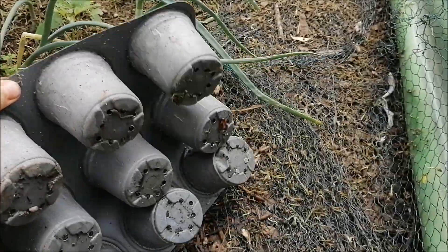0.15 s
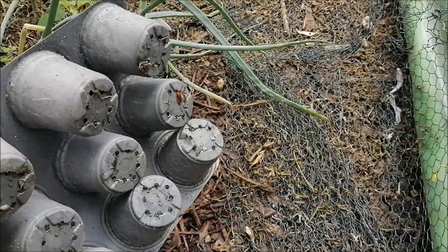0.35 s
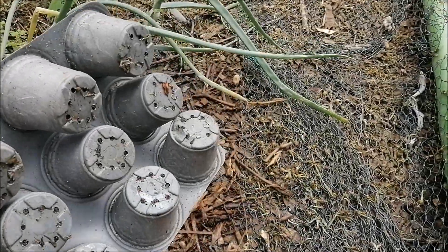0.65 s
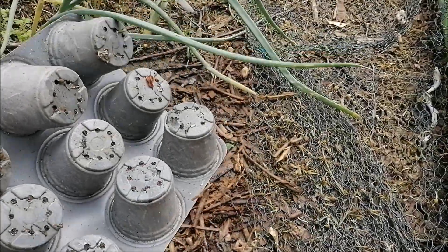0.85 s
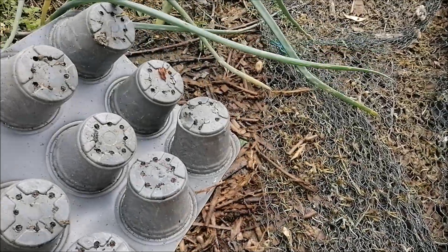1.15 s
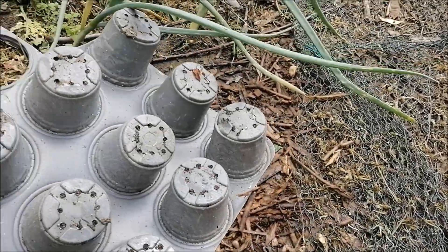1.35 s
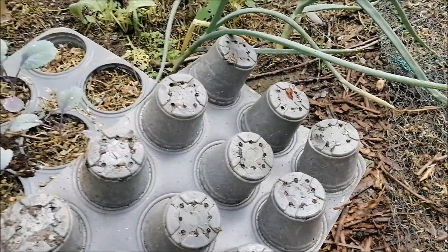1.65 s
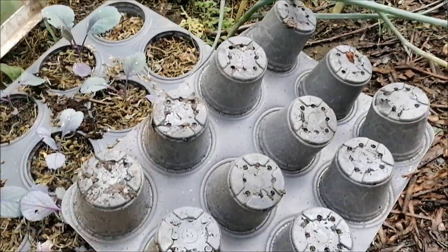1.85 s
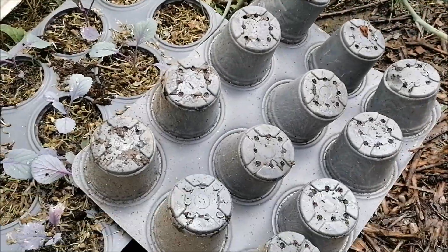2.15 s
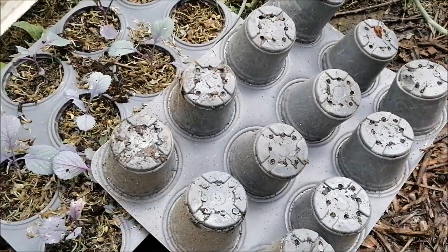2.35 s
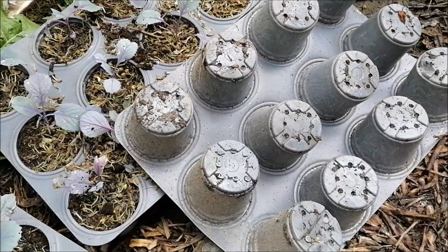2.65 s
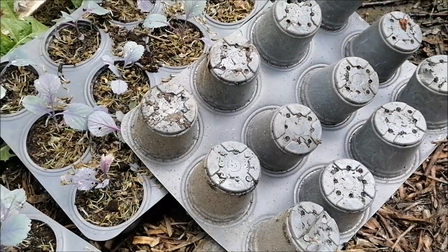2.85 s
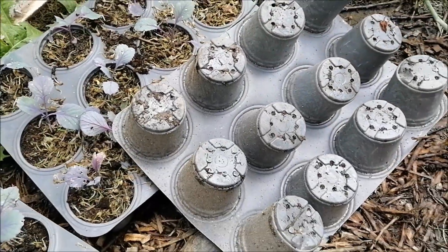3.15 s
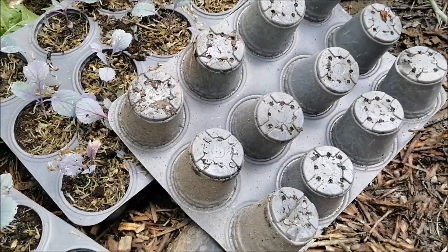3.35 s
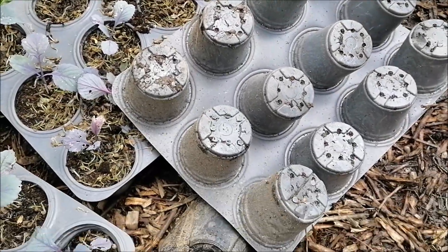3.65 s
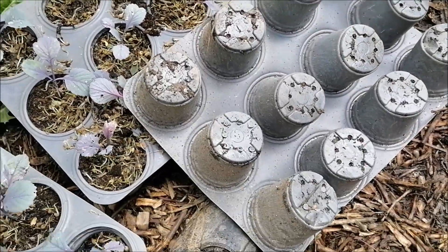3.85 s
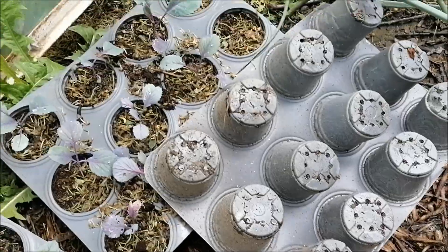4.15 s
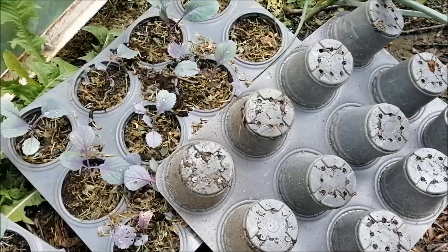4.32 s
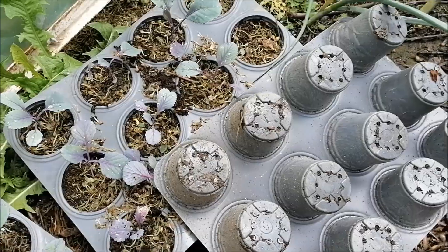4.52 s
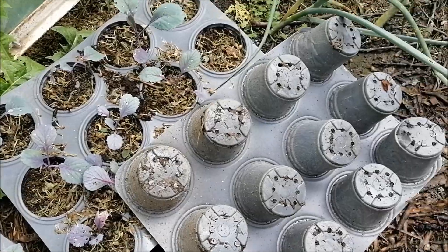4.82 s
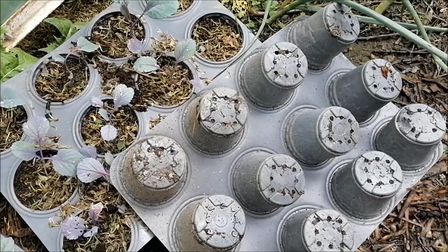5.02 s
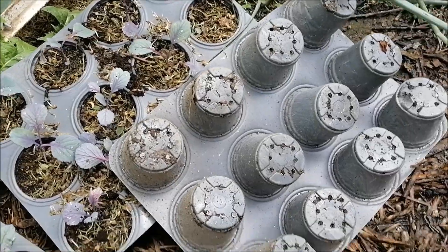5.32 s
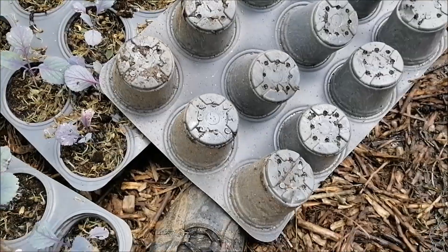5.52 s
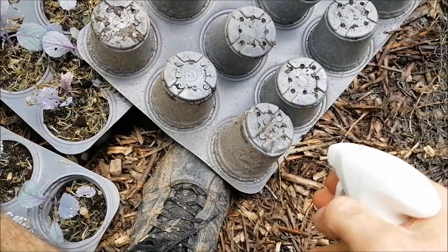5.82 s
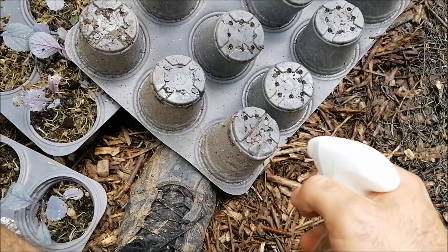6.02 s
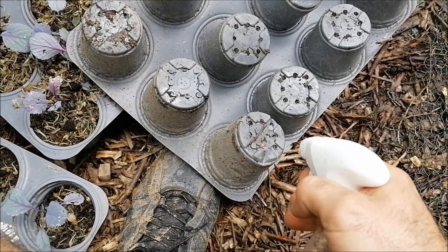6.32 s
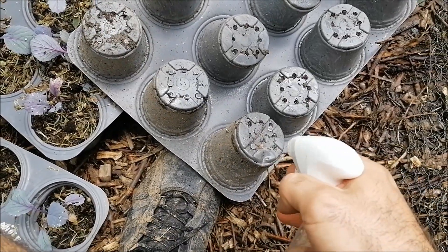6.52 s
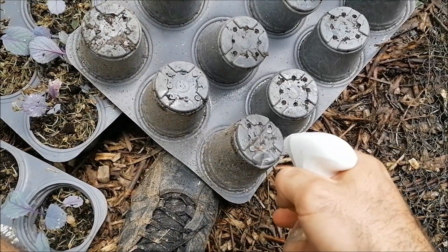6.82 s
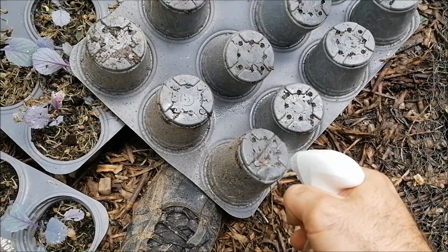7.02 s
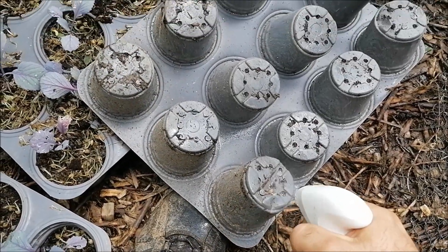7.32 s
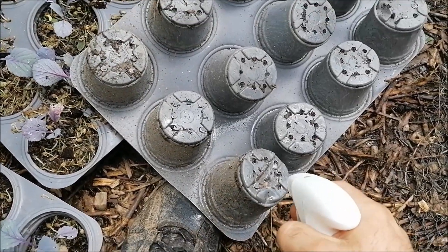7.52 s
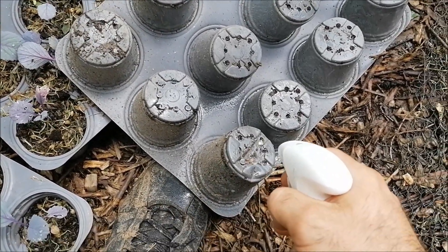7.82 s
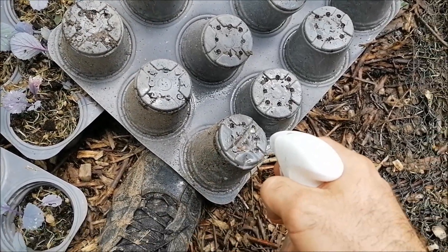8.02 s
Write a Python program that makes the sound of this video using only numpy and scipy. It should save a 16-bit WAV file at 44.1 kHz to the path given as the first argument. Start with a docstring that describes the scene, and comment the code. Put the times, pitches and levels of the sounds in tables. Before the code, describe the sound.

Near stereo microphones outdoors: a bright plastic knock comes first, followed by duller bumps and short scrapes. Sparrows chirp nearby and faintly farther off, echoing lightly from walls. Midway, liquid thumps and gurgles inside a handled plastic bottle, with cloth swishes and twig snaps. Finally come several trigger clicks and squeaky creaks, sputtering air and soft fading sprays, above a soft bed of far traffic.

```python
"""A garden close up: a thin plastic tray is turned over and set down, dragged over soil between knocks.
A half-full spray bottle is picked up and sloshes: thumps, rising bubbles and splashes.
Its trigger is pumped: creaks and spitting air are bursts of clicks, mist is a hiss of tiny grains.
Sleeves and leaves rustle as filtered grains, sparrows chirp as gliding sines between walls,
and far traffic hums as shaped noise."""
import sys
import numpy as np
from scipy import signal
from scipy.io import wavfile

SR = 44100
rng = np.random.default_rng(int(sys.argv[2]) if len(sys.argv) > 2 else 0)


def wav_out(sig):
    """Save sig, one row per channel (or a flat mono array), as 16-bit PCM at SR to the path in sys.argv[1]."""
    wavfile.write(sys.argv[1], SR, np.round(np.clip(np.atleast_2d(sig).T, -1, 1) * 32767).astype(np.int16))


def gain_from_decibels(decibels):
    """Convert decibel values to linear amplitude factors."""
    exponent = np.asarray(decibels, float) / 20
    return 10 ** exponent


N = 360297      # samples, a little over 8 s

# Open air with its hum. Each row: frequency in Hz, level in dB per Hz.
AIR_SPECTRUM = [(12, -35), (20, -8.5), (64, 0.5), (171, -6.5), (238, 2.5), (324, -4), (505, -21),
                (725, -18.5), (1380, -24.5), (3750, -18.5), (4430, -19.5), (8400, -39.5), (9660, -24),
                (11500, -39), (14300, -56), (15500, -64)]
AIR_DB = -53      # overall rms of air and hum, traffic swells included
# Traffic swelling. Each row: time in seconds, gain below 140 Hz in dB, gain from 140 to 400 Hz in dB.
TRAFFIC = [(0, 3.5, -2), (.7, 2, -5.5), (2, -1, -4), (3.3, 1, -5), (5, 4, 0), (6.3, 0, -4.5), (7, -3, -5.5),
           (7.5, 5.5, -3), (8.17, 5, -6)]
# How alike left and right are. Each row: frequency in Hz, likeness (1 = the same).
LIKENESS = [(60, 0.89), (290, 0.83), (640, 0.063), (1400, 0.011)]

# Sleeves, fingers and leaves rubbing. Each row: time in seconds, level in dB, left over right in dB.
RUSTLE = [(0, -56.5, -9), (.38, -62, 9), (.5, -99, 1), (.75, -89, 15), (.86, -62, -7), (1.2, -69, -10),
          (1.41, -57, 1), (1.62, -80, 2), (2.5, -74, 4), (2.8, -68, 6), (3.1, -100, 17), (3.9, -73, 7),
          (4.1, -53, 2), (4.35, -73.5, 3), (4.6, -58.5, 3), (4.89, -51, 2.5), (5.1, -50, 4.5),
          (5.28, -65, 8), (5.62, -58.5, 4), (5.9, -77, 14), (6.14, -77.5, 5), (6.3, -56.5, 3),
          (6.6, -71, 3), (8.17, -83, 12)]
# Tone of the rubbing. Each row: frequency in Hz, level in dB per Hz.
RUSTLE_SPECTRUM = [(900, -1), (1500, -2), (2300, -1), (4000, -3.5), (6000, -4.5), (8000, -8.5),
                   (10000, -16.5), (12000, -18.5), (15500, -40)]
# Short bright swishes of cloth. Each row: start in seconds, level in dB, swell in seconds,
# time to fade by 60 dB in seconds.
SWISHES = [(1.33, -59, 0.034, 0.21), (3.77, -58, 0.025, .3), (4.96, -44, 0.031, 0.12),
           (5.37, -44.5, 0.041, 0.13), (6.3, -55.5, 0.025, 0.1), (2.24, -60, 0.09, 0.25)]
# Tone of the swishes. Each row: frequency in Hz, level in dB per Hz.
SWISH_SPECTRUM = [(3500, -19), (4800, -7), (5800, -1.5), (7500, -2), (10000, -9.5), (12000, -12.5),
                  (15500, -19)]
# Tiny dry snaps of leaf and twig. Each row: start in seconds, peak in dB, ring in Hz, left over right in dB.
SNAPS = [(0.593, -54, 5400, -14), (2.571, -52, 9200, 8), (2.633, -42, 3300, 4.5), (2.685, -50, 9000, 10),
         (2.763, -50, 8000, 10), (2.85, -45, 3000, 2), (2.877, -40, 5500, -6.5), (3.727, -48, 5900, 7.5),
         (3.81, -48, 5000, 4), (4.32, -50, 7500, 3), (4.122, -56, 7870, 6), (4.226, -40.5, 9500, 9),
         (4.377, -40, 6450, 3), (4.409, -33, 5900, 2), (4.599, -45, 4950, -1), (4.687, -29, 2570, 2),
         (5.168, -33, 6460, 10), (5.172, -33, 2700, 4), (5.231, -43, 8700, 14), (6.284, -44, 7200, 3.5),
         (6.315, -44, 7600, -1.5), (7.868, -63, 10000, 2), (8.108, -60, 10000, 2)]

# Tray knocks. Each row: start in seconds, peak in dB, gain of the modes above 1300 Hz in dB,
# contact length in seconds.
KNOCKS = [(0.065, -13.5, 45, 0.0048), (0.167, -34.5, -5, 0.012), (0.236, -40, -5, 0.015),
          (0.303, -27, -6.5, 0.0054), (0.34, -25.5, 9, 0.0055), (0.429, -28.5, 0, 0.0031),
          (0.099, -45, -8, 0.004), (0.298, -38, -14, 0.004), (0.697, -53, -8, 0.0071),
          (0.899, -45, -4, 0.0053), (0.927, -35, 33, 0.0041), (1.043, -33.5, 0.5, 0.0085),
          (1.337, -37, -1, 0.011)]
# Ways the tray rings when free. Each row: frequency in Hz, level in dB, time to fade by 60 dB in seconds.
TRAY_MODES = [(334, -16, .04), (600, -4, .03), (760, 0, .03), (920, -4, .022), (1464, -2, .012),
              (1750, -2, .011), (2261, -3, .01), (2832, -5, .008), (3500, -7, .007), (4307, -8, .006),
              (5475, -12, .005), (6300, -17, .004)]
# Tray dragged over soil in three pulls, each a list. Each row: time in seconds, level in dB.
DRAG = [
    [(.06, -72), (.1, -51), (.2, -56), (.25, -49), (.33, -46.5), (.42, -54.5), (.52, -56), (.65, -77)],
    [(.79, -68), (.87, -64), (1.05, -55), (1.15, -67)],
    [(1.28, -63), (1.36, -56), (1.45, -67), (1.55, -76)],
]
# The hand on the tray shortens rings to this share of their free length: above and below 1300 Hz.
HAND_DAMPING, CELL_DAMPING = 0.24, 0.36

# The clearest sparrow chirps. Each row: start in seconds, length in seconds, start pitch in Hz,
# end pitch in Hz, level in dB, left over right in dB.
CHIRPS = [(.16, 0.13, 3630, 3680, -57.5, -0.5), (.31, 0.12, 4320, 2436, -48.5, 4),
          (.37, 0.042, 4730, 3780, -53, 4.5), (.62, 0.085, 4350, 3300, -61.5, 3.5),
          (.8, 0.044, 3230, 3520, -59, 2.5), (1.02, 0.11, 4500, 4360, -60, 3.5),
          (1.1, 0.034, 3620, 3650, -57, -1), (1.385, 0.082, 3720, 2320, -49.5, 4.5),
          (1.57, 0.077, 4540, 3040, -50, 2.5), (1.715, 0.06, 4000, 2910, -52.5, 2),
          (1.76, 0.063, 3000, 2337, -50.5, 0.5), (1.818, 0.039, 4800, 3590, -48.5, 4),
          (1.84, 0.079, 3280, 2290, -58.5, 2), (2.34, 0.059, 4500, 3890, -50, 4),
          (2.388, 0.06, 4500, 2936, -40, 2), (2.437, 0.033, 3400, 2410, -46, 1.5),
          (2.785, 0.076, 3350, 3120, -54.5, 1), (2.93, 0.035, 3600, 3620, -66, 4),
          (2.985, 0.055, 4600, 2940, -44, 2), (3.025, 0.069, 3040, 2506, -47.5, 5.5),
          (3.085, 0.1, 4010, 2190, -46, 5), (3.3, 0.041, 4400, 3300, -48.5, 3.5),
          (3.34, 0.077, 3300, 2630, -53, 1), (3.52, 0.066, 4340, 3300, -59, 5),
          (3.62, 0.064, 4160, 3990, -61, 0), (3.66, 0.07, 4200, 2880, -53, 5),
          (3.885, 0.08, 3700, 2750, -48, 4), (3.955, 0.04, 4200, 2780, -45.5, 1.5),
          (3.99, 0.04, 3200, 2500, -47, 0), (4.07, 0.056, 4640, 3190, -44.5, 3.5),
          (4.15, 0.05, 3800, 4070, -48.5, 1.5), (4.18, 0.048, 4000, 2215, -50.5, -0.5),
          (4.29, .11, 3920, 3400, -53, 2), (4.58, 0.059, 3750, 3530, -50, 2),
          (4.62, 0.026, 3700, 3020, -61, -1), (4.78, 0.069, 4200, 2980, -47, 3.5),
          (5.1, 0.052, 4030, 3490, -51.5, 1.5), (5.68, 0.069, 4710, 2676, -45.5, 1),
          (5.76, .09, 4275, 3010, -48, 1.5), (5.85, 0.05, 3800, 2880, -59, 2),
          (6.912, 0.031, 3950, 3940, -43, 4), (6.945, 0.066, 4060, 3094, -46, 1.5),
          (7.5, 0.074, 3990, 3570, -49.5, 4.5), (7.795, 0.044, 4300, 4200, -50.5, 3.5),
          (7.83, 0.1, 3890, 2770, -54, 2), (7.905, 0.065, 4520, 3300, -47.5, 1),
          (7.95, 0.048, 3790, 2804, -52, 1), (8.14, 0.057, 4600, 2600, -42, 1.5)]
SCOOP, SCOOP_S = 0.299, 0.00501      # chirps scoop up from below: share of the start pitch, time in seconds
BIRD_TOP_HZ = 4920      # little of the chirps carries above this
FLOCK_DB = -62      # quietest far chirp

# Liquid slapping the bottle wall; the row at 6.853 s is a trigger creak, voiced the same way. # Each row: start
# in seconds, thump in dB, cavity in Hz, bubble in Hz, bubble in dB.
SLOSH = [(3.713, -41, 365, 700, -45), (3.782, -30, 360, 770, -41), (3.798, -35, 356, 660, -35),
         (3.821, -35, 217, 770, -48), (3.956, -34.5, 370, 640, -41.5), (4.03, -52, 338, 700, -43),
         (4.061, -47, 328, 1660, -41), (4.119, -32.5, 330, 1750, -35), (4.313, -37.5, 226, 1475, -41),
         (4.389, -38.5, 416, 1430, -44.5), (4.453, -37.5, 386, 1110, -61), (4.498, -69, 300, 1500, -46),
         (4.55, -31.5, 474, 830, -36), (4.561, -53, 470, 1000, -36.5), (4.642, -46, 295, 2300, -45),
         (4.692, -35, 260, 1140, -30.5), (4.742, -59, 310, 2400, -34), (4.833, -42, 488, 980, -67),
         (4.852, -30.5, 390, 1370, -61), (4.89, -75, 380, 1560, -39), (5.026, -28.5, 455, 1340, -38),
         (5.079, -42, 296, 2060, -50), (5.167, -42, 450, 1660, -19), (5.171, -25, 470, 900, -45),
         (5.227, -37, 483, 1420, -33), (5.014, -60, 397, 1380, -40), (5.411, -31.5, 350, 813, -33),
         (5.465, -38, 504, 2210, -41), (5.596, -34.5, 216, 730, -44), (6.402, -43, 255, 2230, -37),
         (6.562, -39, 510, 2340, -37), (6.691, -40, 550, 2190, -33.5), (6.716, -40, 375, 2180, -44),
         (6.853, -63, 305, 1300, -36), (6.859, -31.5, 270, 2340, -32), (6.998, -41, 360, 2250, -40),
         (7.131, -37.5, 257, 2410, -34), (7.144, -72, 344, 1160, -44), (7.166, -41, 320, 845, -42)]
SPLASH_DB, SPLASH_S = -4, 0.0055      # splash level against its bubble, its length in seconds
# Swilling around each slap: base level in dB, share of the slap's dB added.
SWILL_DB, SWILL_SHARE = -38.5, 0.53
SWILL_SWELL_S, SWILL_T60_S = 0.042, 0.48      # build-up, time to fade by 60 dB

# Trigger creaks. Each row: start in seconds, peak in dB, length in seconds.
CREAKS = [(6.531, -22.5, 0.014), (6.54, -38, 0.0053), (6.546, -18, 0.002), (6.549, -43, 0.0054),
          (6.675, -34.5, 0.018), (6.846, -29.5, 0.018), (6.863, -55, 0.0035), (6.995, -34.5, 0.0074),
          (7.126, -25.5, 0.0051), (7.135, -40, 0.0055), (7.141, -24, 0.003), (7.172, -53, 0.0028)]
# Resonances of the trigger. Each row: frequency in Hz, width in Hz, level in dB.
TRIGGER = [(900, 310, -19), (1300, 650, -1), (2230, 110, 15), (3300, 810, 16.5), (4200, 1250, 12),
           (5270, 660, 13.5), (7100, 1600, 3)]
# Air spitting through the nozzle. Each row: start in seconds, peak in dB.
SPITS = [(6.543, -32), (6.556, -32.5), (6.875, -30), (6.887, -35), (6.912, -35.5), (6.949, -31.5),
         (6.999, -47), (7.038, -46), (7.086, -40.5), (7.122, -34), (7.14, -30), (7.16, -30)]
SPIT_S = 0.0078      # length of one spit in seconds
# Resonances of the nozzle. Each row: frequency in Hz, width in Hz, level in dB.
NOZZLE = [(5400, 9500, 5.5), (10170, 880, 12.5), (13000, 3700, 1.5)]
# Mist leaving the nozzle. Each row: start in seconds, level in dB, swell in seconds,
# time to fade by 60 dB in seconds.
MIST = [(6.54, -41.5, 0.0035, 0.54), (6.68, -54.5, .017, 0.22), (6.845, -45.5, 0.011, 0.58),
        (6.95, -54, 0.037, 1.0), (7.125, -47, 0.026, 0.64), (7.405, -46.5, 0.03, 0.53),
        (7.43, -47.5, 0.066, 0.15)]
# Tone of the mist. Each row: frequency in Hz, level in dB per Hz.
MIST_SPECTRUM = [(1500, -5), (2100, -5), (2900, 5), (4000, 2.5), (6000, 4), (8000, -1), (10000, -4.5),
                 (12500, -6.5), (15500, -24)]
VALVE_S, VALVE_HZ, VALVE_DB = 7.405, 3300, -24.5      # the valve ticks open

# The microphone port resonates: pitch, width, level of the resonance added to the sound in dB.
PORT_HZ, PORT_WIDTH_HZ, PORT_DB = 9800, 1600, -4.5


def rms_one(x):
    """Scales a sound to rms 1."""
    return x / np.sqrt(np.mean(x ** 2) + 1e-20)


def in_time(rows, outside=None):
    """Reads each column of a curve at every sample."""
    s, *columns = np.transpose(rows)
    t = np.arange(N) / SR
    return [np.interp(t, s, column, outside, outside) for column in columns]


def gated(tables):
    """Gain from level curves that are silent outside their spans."""
    return sum(gain_from_decibels(in_time(rows, -200)[0]) for rows in tables)


def swells(rows):
    """Gain that swells smoothly at each row, then dies away."""
    t, out = np.arange(N) / SR, 0
    for s, db, swell_s, t60 in rows:
        progress = np.clip((t - s) / swell_s, 0, 1)
        fade_db = -60 * np.maximum(t - s - swell_s, 0) / t60
        out = out + gain_from_decibels(db + fade_db) * np.sin(progress * np.pi / 2) ** 2
    return out


def at_hz(points, hz):
    """Reads a spectrum on a log-frequency axis."""
    points = np.array(points)
    return np.interp(np.log(hz), np.log(points[:, 0]), points[:, 1])


def drift(rate):
    """Smoothed chance of rms 1; a higher rate wanders faster."""
    r = np.exp(-80 * np.pi * rate / SR)
    noise = rng.standard_normal(N // 40 + 2002)      # one value per 40 samples
    slow = signal.lfilter([1], [1, -2 * r, r * r], noise)[2000:]
    return np.interp(np.arange(N) / 40, np.arange(len(slow)), rms_one(slow))


def resonate(x, hz, width_hz):
    """Resonance with gain 1 on top."""
    r = np.exp(-np.pi * width_hz / SR)
    poles = [1, -2 * r * np.cos(2 * np.pi * hz / SR), r * r]
    return signal.lfilter([(1 - r * r) / 2, 0, (r * r - 1) / 2], poles, x + 1e-18)


def body(x, peaks):
    """Resonances side by side, signs alternating."""
    return sum((-1) ** k * gain_from_decibels(db) * resonate(x, hz, width) for k, (hz, width, db) in enumerate(peaks))


def ringing(hz, t60, rise=0., length=.12):
    """A dying sine whose pitch may rise."""
    t = np.arange(int(length * SR)) / SR
    return np.sin(2 * np.pi * hz * t * (1 + rise * t / t60)) * gain_from_decibels(-60 * t / t60)


def burst(length_s, peaks, per_s):
    """A quick swell of uneven clicks through resonances; peak 1."""
    t = np.arange(1600) / SR / max(length_s, .0005)
    clicks = rng.standard_normal(1600) * (rng.random(1600) < per_s / SR)
    x = body(clicks * t * np.exp(-t ** 2), peaks)
    return x / (np.abs(x).max() + 1e-12)


def grains(per_s, spread_db):
    """Two channels of random clicks of uneven size."""
    size_db = spread_db * np.minimum(rng.exponential(1, (2, N)), 5)
    size = gain_from_decibels(size_db) * rng.choice([-1, 1], (2, N))
    return size * (rng.random((2, N)) < per_s / SR)


def banded(white, spectrum, patchy_db, bass_db=(0, 0)):
    """Half-octave bands, each with its own level, flicker and left-right likeness; rms 1."""
    out, edges = 0, 20 * 2 ** np.arange(0, 9.8, .5)
    for k, (low, high) in enumerate(zip(edges, edges[1:])):
        hz = np.sqrt(low * high)
        if hz < spectrum[0][0]:
            continue
        band = signal.butter(2, [low, high], "band", fs=SR, output="sos")
        mid, side = signal.sosfilt(band, white[k % 2])
        alike = np.clip(at_hz(LIKENESS, hz), -1, 1)
        flicker_db = patchy_db * drift(9)
        swell_db = bass_db[int(hz > 140)] * (hz < 400)
        gain = gain_from_decibels(at_hz(spectrum, hz) + flicker_db + swell_db)
        out = out + gain * (np.sqrt(1 + alike) * mid + np.sqrt(1 - alike) * side * [[1], [-1]])
    return rms_one(out)


def add(out, s, sound, pan_db, lag=0):
    """Places a sound between two spaced microphones; the left one hears it lag samples late."""
    for ch, (shift, side) in enumerate([(max(lag, 0), .5), (max(-lag, 0), -.5)]):
        i = round(s * SR) + shift
        out[ch, i:i + len(sound)] += gain_from_decibels(side * pan_db) * sound[:max(N - i, 0)]


def walls(x, t60, gap_s):
    """Dense echoes off walls and fences: dying noise, another for each channel."""
    t = np.arange(int(.6 * SR)) / SR
    tail = rng.standard_normal((2, len(t))) * gain_from_decibels(-60 * t / t60) * (t > gap_s)
    tail = tail / np.sqrt(np.sum(tail ** 2, axis=1, keepdims=True))
    return signal.fftconvolve(x, tail, axes=1)[:, :N]


def open_air():
    """Far traffic and air blur into noise, whose bass swells and sinks."""
    white = rng.standard_normal((2, 2, N))
    return gain_from_decibels(AIR_DB) * banded(white, AIR_SPECTRUM, patchy_db=3.5, bass_db=in_time(TRAFFIC))


def rustle():
    """Rubbing is a dense stream of grains, cloth swishes are smooth noise, snaps are lone bursts."""
    rubs = np.stack([grains(6000, 2.5), grains(6000, 3.5)])
    level_db, side_db = in_time(RUSTLE)
    out = gain_from_decibels(level_db + side_db * [[.5], [-.5]]) * banded(rubs, RUSTLE_SPECTRUM, patchy_db=3.5)
    swish = banded(rng.standard_normal((2, 2, N)), SWISH_SPECTRUM, patchy_db=1)
    out += swells(SWISHES) * swish * gain_from_decibels([[3.0], [-3.0]])      # louder on the left
    for s, db, hz, pan_db in SNAPS:
        peaks = [(hz, 1800, 0), (1.4 * hz, 3000, -6), (0.6 * hz, 2500, -5)]
        add(out, s, gain_from_decibels(db) * burst(0.0011, peaks, 36000), pan_db, lag=-round(pan_db))
    return out


def tray_rings(bright_db):
    """The tray flexes, so each mode's strength and pitch differ at every knock."""
    rings = 0
    for (hz, db, t60), (louder, sharper) in zip(TRAY_MODES, rng.normal(0, 1, (len(TRAY_MODES), 2))):
        level_db = db + 2 * louder + bright_db * (hz > 1300) - 9 * (hz < 400)
        damping = HAND_DAMPING if hz > 1300 else CELL_DAMPING
        rings = rings + gain_from_decibels(level_db) * ringing(hz * (1 + .06 * sharper), damping * t60)
    return rings


def tray():
    """Knocks are short clusters of contacts into the tray's modes; dragging feeds them dense small clicks."""
    out = np.zeros((2, N))
    thin = signal.butter(3, [540, 6500], "band", fs=SR, output="sos")      # a thin sheet radiates no bass
    for s, db, bright_db, length_s in KNOCKS:
        rings = tray_rings(bright_db)
        t = np.arange(800) / SR / max(length_s, .001)
        contact = rng.standard_normal(800) * np.exp(-t ** 2) * (rng.random(800) < .35)
        contact[0] = 3.1      # a firm first touch
        if bright_db < 0:      # dull knocks are soft contacts
            contact = np.convolve(contact, np.hanning(16))
        hit = signal.sosfilt(thin, np.convolve(rings, contact))
        add(out, s, gain_from_decibels(db) * hit / np.abs(hit).max(), -1.6, lag=8)
    grit = grains(2200, 3.5)[0] * gain_from_decibels(2 * drift(40))
    peaks = []
    for hz, db, t60 in TRAY_MODES:
        tilt_db = -13.6 * np.log2(hz / 760) * (hz > 800) + 14.0 * (hz < 400)      # weaker treble, more bass
        peaks.append((hz, 4 / t60, db + tilt_db))
    scrape = body(grit, peaks)
    scrape -= resonate(scrape, 448, 230)      # a gap between the sheet's lowest mode and the cells
    add(out, 0, gated(DRAG) * rms_one(scrape), -1.5, lag=4)
    return out


def calls(rows, trill_hz, trill_depth, throb_db):
    """Two near sines from the two sides of the syrinx glide, waver in pitch and throb unevenly in level."""
    out, wobble = np.zeros((2, N)), [drift(trill_hz) for k in range(3)]
    for s, length_s, start_hz, end_hz, db, pan_db in rows:
        u = np.linspace(0, 1, int(length_s * SR))      # progress through the chirp
        waver, other, pulse = (np.resize(w[round(s * SR):], len(u)) for w in wobble)
        scoop = SCOOP * start_hz * np.exp(-u * length_s / SCOOP_S)
        glide = start_hz + (end_hz - start_hz) * u ** .9 - scoop
        main = np.sin(2 * np.pi * np.cumsum(glide * (1 + trill_depth * waver)) / SR)
        upper = np.sin(2 * np.pi * np.cumsum(1.17 * glide * (1 + trill_depth * other)) / SR)
        shape = np.sin(np.pi * u ** 1.3) ** .6 * gain_from_decibels(throb_db * pulse)
        add(out, s, gain_from_decibels(db) * shape * (main + 0.42 * upper), pan_db, lag=-round(2 * pan_db))
    top = signal.butter(8, BIRD_TOP_HZ, fs=SR, output="sos")
    return signal.sosfilt(top, out + 1e-18)


def flock(count):
    """Rows for many far chirps at random moments and places, in the column order of CHIRPS."""
    s, length, top, drop, db, pan = rng.random((count, 6)).T
    start_hz, end_hz = 3600 + 1200 * top, 4400 - 1800 * drop
    return np.transpose([8.1 * s, .05 + .1 * length, start_hz, end_hz, FLOCK_DB + 4 * db, 10 * pan - 5])


def sparrows():
    """Clear chirps are heard directly and with echoes; far ones come only by way of the late echoes."""
    birds = calls(CHIRPS, trill_hz=160, trill_depth=.028, throb_db=4)
    far = calls(flock(count=120), trill_hz=110, trill_depth=.045, throb_db=3.5)
    early = gain_from_decibels(-1.5) * walls(birds, t60=0.09, gap_s=0.002)
    late = gain_from_decibels(-4) * walls(birds + far, t60=0.32, gap_s=0.028)
    return birds + early + late


def bottle():
    """Slaps thump the air cavity, set off a rising bubble and a splash; swilling is a patter of small slaps."""
    out = np.zeros((2, N))
    soft = np.minimum(np.arange(int(.12 * SR)) / (.007 * SR), 1)      # liquid lands softly
    splash_peaks = [(566, 91, 1.1), (1270, 1100, 6.2), (1720, 1380, 5.1), (2600, 540, 4.3)]
    for s, db, cavity_hz, bubble_hz, bubble_db in SLOSH:
        thump = ringing(cavity_hz, .065) + .4 * ringing(.6 * cavity_hz, .05)
        thump = soft * (thump + .35 * ringing(1.3 * cavity_hz, .04))
        bubble = soft ** .3 * ringing(bubble_hz, .03, rise=.07)
        splash = burst(SPLASH_S, splash_peaks, 4000)
        add(out, s, gain_from_decibels(db) * thump + gain_from_decibels(bubble_db) * bubble, 2.5, lag=-6)
        add(out, s, gain_from_decibels(bubble_db + SPLASH_DB) * splash, 2.5, lag=-8)
    slaps = signal.lfilter([1], [1, -1.7, .7225], grains(700, 2.8)[0])      # clicks rounded off
    patter = body(slaps, [(212, 16, 1), (357, 31, 1.0), (470, 95, -2.5),
                          (700, 700, -12.5), (1300, 560, -10.5), (2300, 730, -7.5)])
    swill_rows = [(s - SWILL_SWELL_S, SWILL_DB + SWILL_SHARE * db, SWILL_SWELL_S, SWILL_T60_S)
                  for s, db, *_ in SLOSH]
    add(out, 0, swells(swill_rows) * rms_one(patter), 2.5)
    return out


def sprayer():
    """The piston sticks and slips, air pockets spit through the nozzle, mist hisses as dense grains."""
    out = np.zeros((2, N))
    for s, db, length_s in CREAKS:
        add(out, s, gain_from_decibels(db) * burst(length_s, TRIGGER, 5900), 2.5, lag=-3)
    for s, db in SPITS:
        add(out, s, gain_from_decibels(db) * burst(SPIT_S, NOZZLE, 20000), 3.5, lag=1)
    tick = burst(.002, [(VALVE_HZ, 350, 0), (2 * VALVE_HZ, 350, 3)], 20000)
    add(out, VALVE_S, gain_from_decibels(VALVE_DB) * tick, 5, lag=-3)
    drops = np.stack([grains(14000, 2.7), grains(14000, 3.5)])
    mist = swells(MIST) * banded(drops, MIST_SPECTRUM, patchy_db=3.0)
    return out + mist * gain_from_decibels([[1.0], [-1.0]])      # a little louder on the left


def scene():
    """Near things with a little scatter, birds between walls, open air."""
    near = rustle() + tray() + bottle() + sprayer()
    treble = signal.butter(2, 900, "high", fs=SR, output="sos")
    scatter = gain_from_decibels(-7) * signal.sosfilt(treble, walls(near, t60=.04, gap_s=.0015))
    return near + scatter + sparrows() + open_air()


def band_limit(x):
    """A steep low-pass at the top of the band."""
    return signal.sosfilt(signal.butter(12, 15830, fs=SR, output="sos"), x)


def record(dry):
    """The microphone port lifts a treble peak, then the top is cut."""
    lifted = dry + gain_from_decibels(PORT_DB) * resonate(dry, PORT_HZ, PORT_WIDTH_HZ)
    top_cut = signal.cheby2(12, 60, 15900, fs=SR, output="sos")
    return band_limit(signal.sosfilt(top_cut, lifted))


dry = scene()
out = record(dry)
wav_out(out)
```